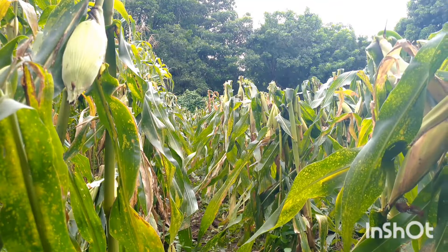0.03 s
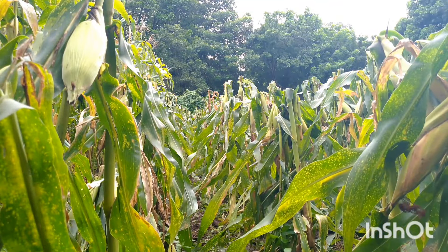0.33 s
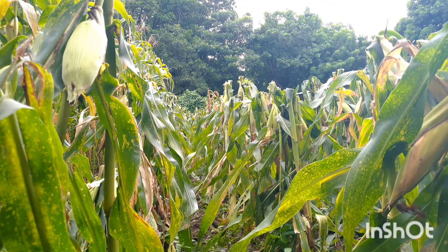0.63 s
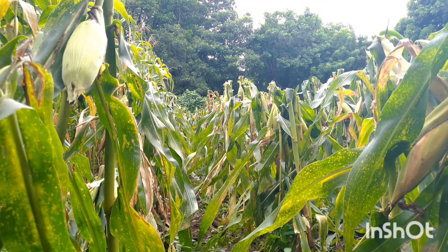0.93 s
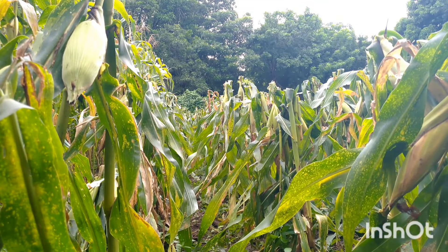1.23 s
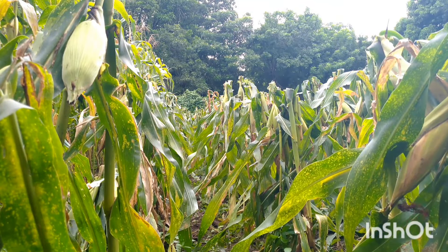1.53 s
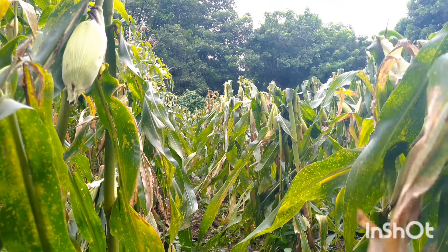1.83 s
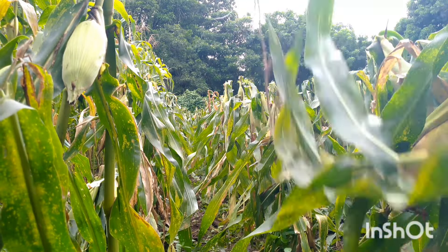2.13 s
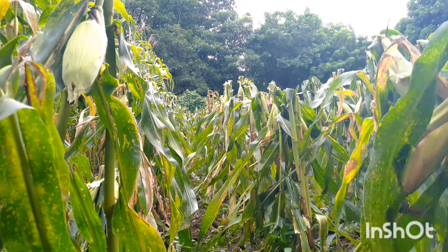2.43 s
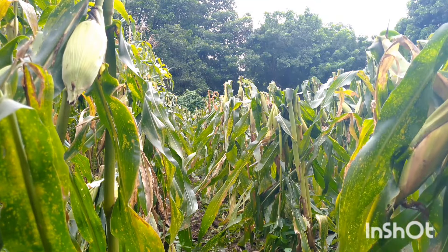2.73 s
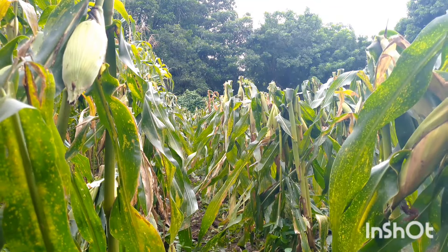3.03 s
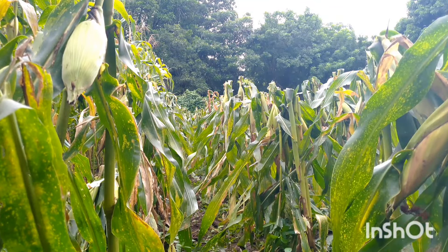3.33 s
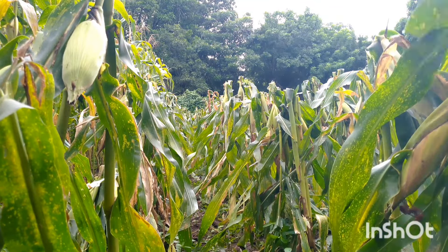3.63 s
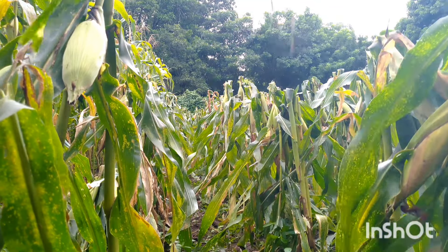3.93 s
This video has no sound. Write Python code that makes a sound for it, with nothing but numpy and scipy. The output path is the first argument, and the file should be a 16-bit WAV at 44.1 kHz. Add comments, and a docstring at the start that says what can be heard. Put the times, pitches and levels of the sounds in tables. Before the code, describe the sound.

Dry corn leaves rustle close to the microphone, softly at first, in uneven hissing strokes. Brittle ticks and light slaps start around 0.9 seconds. A leaf knocks a stalk at about 1.8 seconds, and the rustling and crackling swell until 2.8. After a brief lull near 3 seconds, the rustle returns, with a cluster of sharp snaps from 3.6 to 3.9. Faint outdoor air and a low hum lie far behind.

```python
"""In a corn field, dry leaves are pushed about close to the microphone.
Blades slide over each other in uneven strokes, and stick-slip friction excites hiss, rasp and flutter.
Ribs fracture with bright ticks, creases give way, leaves slap the stalks and one stalk rings briefly.
The surrounding plants scatter the ticks and crinkles; outdoor air and a faint low hum lie far behind."""
import sys
import numpy as np
from scipy import signal
from scipy.fft import rfft, irfft
from scipy.io import wavfile
from scipy.ndimage import uniform_filter1d

SR = 44100
rng = np.random.default_rng(int(sys.argv[2]) if len(sys.argv) > 2 else 0)


def waveform_to_disk(signal):
    """Save audio, clipped to [-1, 1], as 16-bit WAV at the path in sys.argv[1]."""
    frames = np.transpose(np.atleast_2d(signal))
    scaled = np.clip(frames, -1, 1) * 32767
    samples = np.round(scaled).astype(np.int16)
    wavfile.write(sys.argv[1], SR, samples)


N = 176400

# Continuous rustle beneath the strokes: (time [s], hiss level [dB])
STIR_LEVELS = [(0, -45.5), (.08, -44), (.28, -43.5), (.59, -39.5), (.625, -44.5), (.69, -41), (.84, -43),
               (1.06, -39), (1.115, -43), (1.3, -37), (1.7, -39.5), (1.9, -37.5), (2.25, -52), (2.5, -37.5),
               (2.82, -40), (2.9, -43), (3.02, -48.5), (3.11, -46), (3.3, -40.5), (3.66, -43.5), (4.0, -67)]
# One leaf sliding over another:
# (start [s], rise [s], hold [s], release [s], hiss [dB], rasp [dB], flutter [dB])
SLIDING_STROKES = [ (0.094, 0.029, 0.065, 0.11, -35.5, -44, -48.5),
                   (0.272, 0.12, 0.1, 0.036, -40, -47.5, -51),
                   (0.864, 0.014, 0.018, 0.023, -35, -41, -47.5),
                   (1.202, 0.005, 0.0075, 0.16, -32, -42.5, -47),
                   (1.4, 0.063, 0.027, 0.094, -35.5, -45, -50.5),
                   (1.514, 0.053, 0.038, 0.091, -31, -48, -53),
                   (1.729, 0.045, 0.0097, 0.045, -29.5, -41, -44),
                   (1.929, 0.017, 0.012, 0.03, -32, -37.5, -65),
                   (1.984, 0.028, 0.11, 0.068, -33, -44.5, -75),
                   (2.096, 0.082, 0.13, 0.035, -30, -40, -45.5),
                   (2.204, 0.094, 0.046, 0.052, -40, -37.5, -49),
                   (2.319, 0.016, 0.062, 0.12, -31.5, -40, -46.5),
                   (2.508, 0.062, 0.026, 0.13, -38, -37.5, -48.5),
                   (2.675, 0.028, 0.052, 0.044, -37, -39.5, -55),
                   (3.228, .006, 0.02, 0.13, -31, -41.5, -56),
                   (3.367, 0.027, 0.062, 0.036, -35.5, -45, -73),
                   (3.72, 0.03, 0.084, 0.066, -38, -51.5, -75), (3.839, 0.03, 0.1, .08, -31, -37, -49),
                   (3.91, 0.015, 0.049, 0.032, -27.5, -38, -41)]
# Dry ribs breaking: (time [s], level [dB], tick frequency [Hz], blade jolt re tick [dB])
RIB_SNAPS = [ (0.8906, -19.5, 8000, -11), (1.0749, -16, 8950, -11), (1.0922, -10.5, 9650, -39),
             (1.182, -17, 8500, -23), (1.4371, -27, 7000, 11), (1.794, -11, 9300, -30),
             (1.9774, -10, 8500, -35), (2.0778, -8, 8600, -41), (2.0896, -8.5, 10400, -10.5),
             (2.1076, -11.5, 6800, -26), (2.118, -11.5, 7900, -18), (2.6978, -12.5, 8440, -10),
             (2.7375, -13, 9500, -29), (3.368, -10, 10100, -44), (3.407, -18, 9000, -10),
             (3.6047, -17, 8100, -33), (3.6113, -8, 7640, -20.5), (3.6780, -5.5, 7900, -22),
             (3.694, -10, 7900, -28), (3.725, -16, 7550, -34), (3.7596, -16.5, 7040, -34),
             (3.7688, -17, 8400, -33), (3.8093, -12, 9700, -21), (3.8116, -12, 8600, -32),
             (3.8255, -12, 9200, -28), (3.9094, -10.5, 9300, -35)]
# A leaf buckling or slapping a stalk:
# (time [s], level [dB], centre frequency [Hz], width [octaves], decay time [s])
LEAF_SLAPS = [ (0.154, -37.5, 480, 1.7, 0.012), (0.891, -31, 3250, 0.39, 0.0043),
              (1.068, -34, 2090, 0.18, 0.0085), (1.074, -27.5, 10000, 1.3, 0.008),
              (1.156, -28, 3500, 2.1, 0.011), (1.183, -24.5, 6500, 1.8, 0.0059),
              (1.263, -30, 980, 0.58, 0.0047), (1.314, -31.5, 2600, 1.2, 0.0029),
              (1.469, -37, 750, 1.4, 0.0093), (1.5108, -25, 3430, 0.44, 0.0035),
              (1.7331, -21.5, 1040, 1.8, 0.0068), (1.743, -20, 3870, .3, 0.0017),
              (1.766, -27.5, 700, 1.7, 0.0048), (1.774, -27, 1410, 0.67, 0.005),
              (2.089, -45, 150, 2, 0.0069), (2.106, -26, 2690, 0.48, 0.012),
              (2.181, -18.5, 9000, 1.3, 0.006), (2.222, -27, 5500, 1.6, 0.016),
              (2.288, -25.5, 4000, 2.4, 0.0069), (2.341, -26, 1900, 0.93, 0.0072),
              (2.592, -39, 1740, 0.082, 0.033), (2.981, -34.5, 1780, 1.35, 0.0061),
              (3.492, -29.5, 380, 2.2, 0.012), (3.493, -28, 1300, 0.84, 0.0062),
              (3.493, -26.5, 7700, 0.63, 0.028), (3.625, -36, 1830, 0.87, 0.0032),
              (3.677, -28.5, 650, 1.86, 0.0023), (3.693, -28, 3550, 1.24, 0.0079),
              (3.7863, -19, 9900, 0.48, 0.0033), (3.7875, -25, 1300, 1.9, 0.0015),
              (3.832, -34.5, 880, 1.5, 0.0039)]
# Spectra of leaf edge, blade, whole leaf and outdoor air: (frequency [Hz], relative density [dB])
HISS_SPECTRUM = [(1500, -53.5), (3500, -12.5), (5000, -11), (7000, -6), (9000, -3), (10500, 0),
                 (11200, -4.5), (12000, -11.5), (14000, -8.5), (15500, -10.5)]
RASP_SPECTRUM = [(400, -21), (900, -8), (1500, -1.5), (2100, 0.5), (2800, 3.5), (4000, -1.5), (6000, -2),
                 (12000, -16)]
FLUTTER_SPECTRUM = [(30, -35), (100, 3), (200, 7), (450, 7.5), (800, 8), (1300, 6.5), (2500, 6),
                    (8000, -50)]
AIR_SPECTRUM = [(20, -18), (50, 5.5), (100, -14.5), (200, -9), (500, 0), (1500, -7.5), (5000, -36),
                (15000, -17)]
# Lower tone of the distant hum: (time [s], frequency [Hz], level [dB])
HUM_TRACK = [(0, 103, -61), (.55, 99, -66), (.9, 97, -60), (1.2, 99, -69.5), (1.55, 95, -62),
             (2.3, 100, -78), (2.8, 101, -67.5), (3.25, 106, -57), (3.6, 102, -75)]


def leaf_friction(strength, fizz_hz=11200, fizz_ref_db=-16):
    """Stick-slip friction excites the leaf edge (hiss), the blade (rasp) and the limp leaf (flutter)."""
    hiss, rasp, flutter = strength * amp(wander(rate_hz=57))
    edge = colour(slips(per_s=25000, spread_db=2.5, cap=11), HISS_SPECTRUM)
    fizz = signal.sosfiltfilt(signal.butter(6, fizz_hz, "high", fs=SR, output="sos"), edge)
    edge += fizz * ((hiss / amp(fizz_ref_db)) ** 0.059 - 1)  # faster rubbing is brighter
    hiss *= edge * amp(0.79 * wander(rate_hz=34))
    blade = colour(slips(per_s=4500, spread_db=1, cap=4.6), RASP_SPECTRUM)
    rasp *= blade * amp(wander(rate_hz=150))
    leaf = colour(slips(per_s=2700, spread_db=2, cap=4.7), FLUTTER_SPECTRUM)
    flutter *= leaf * amp(1.75 * wander(rate_hz=22))
    return drifting_colour(hiss + rasp + flutter, depth_db=2)


def friction_strength(stir_ref_db=-40, rasp_db=-46, flutter_db=-54.5):
    """Incoherent sources add in power: stir and strokes give the hiss, rasp and flutter amplitudes."""
    t = np.arange(N) / SR
    stir_db = np.interp(t, *np.transpose(STIR_LEVELS))
    swell_db = stir_db - stir_ref_db
    power = amp([stir_db, rasp_db + swell_db, flutter_db + swell_db]) ** 2
    for start, rise, hold, release, *levels_db in SLIDING_STROKES:
        speed = np.interp(t, start + np.cumsum([0, rise, hold, release]), [0, 1, 1, 0])
        power += (amp(levels_db)[:, None] * speed) ** 2
    return np.sqrt(power)


def slips(per_s, spread_db, cap):
    """A Poisson process of tiny slips, a few larger than the rest; sizes span cap times spread_db."""
    size = amp(spread_db * np.minimum(rng.exponential(1, N), cap))
    return unit(size * rng.choice([-1, 1], N) * (rng.random(N) < per_s / SR))


def drifting_colour(x, depth_db, size=512):
    """Brief, narrow patches of random spectral gain make the rustle's colour flicker."""
    spectrogram = signal.stft(x, nperseg=size)[2]
    patches = uniform_filter1d(rng.standard_normal(spectrogram.shape), size=6, axis=0)
    patches = unit(uniform_filter1d(patches, size=3, axis=1))
    return signal.istft(spectrogram * amp(depth_db * patches), nperseg=size)[1][:N]


def rib_snap(level_db, hz, jolt_db):
    """Brittle fracture of a rib radiates a bright tick and a duller jolt of its blade."""
    tick = ping(hz, rise_s=0.00009)
    jolt = amp(jolt_db) * ping(hz=2600, rise_s=0.00007)
    return amp(level_db) * signal.sosfilt(signal.butter(2, 12700, fs=SR, output="sos"), tick + jolt)


def leaf_slap(level_db, hz, octaves, decay_s, rise_s=0.0004, size=8192):
    """Buckling or impact drives one heavily damped resonance with a burst of crackly noise."""
    t, f = np.arange(size) / SR, np.fft.rfftfreq(size, 1 / SR)
    band = np.exp(-0.5 * (np.log2((f + 1) / hz) / octaves) ** 2)
    crackle = rng.standard_normal(size) * np.exp(0.26 * rng.standard_normal(size))
    envelope = np.minimum(t / rise_s, 1) * np.exp(-t / decay_s)
    crumple = irfft(rfft(crackle) * band) * envelope
    return amp(level_db) * crumple * np.linalg.norm(envelope) / np.linalg.norm(crumple)


def stalk_knock(level_db=-25.5, hz=275, sag_s=0.059, decay_s=0.0052, size=4096):
    """Damped free vibration of a stalk struck by a leaf: a hollow note whose pitch sags as it dies."""
    t = np.arange(size) / SR
    cycles = np.cumsum(hz * np.exp(-t / sag_s)) / SR
    return amp(level_db) * np.sin(2 * np.pi * cycles) * np.exp(-t / decay_s)


def crinkles(hiss_strength, level_db=-52, per_s=170, pitches=24, rise_cycles=0.47):
    """Small creases buckle at random, each ringing at its own pitch, more loudly in the strokes."""
    out = np.zeros(N)
    for hz in np.geomspace(1400, 10500, pitches):
        clicks = slips(per_s / pitches, spread_db=3, cap=1.5)
        ring = unit(scattering(ping(hz, rise_cycles / hz)))
        out += signal.oaconvolve(clicks, ring)[:N]
    return amp(level_db) * unit(out * hiss_strength ** 0.68)


def ping(hz, rise_s, size=256):
    """A damped oscillation of a few cycles, whose envelope peaks at 1 after rise_s."""
    t = np.arange(size) / SR
    return t / rise_s * np.exp(1 - t / rise_s) * np.sin(2 * np.pi * hz * t)


def scattering(x, near_s=0.0057, near_db=-8.5, far_s=0.032, far_db=-18, size=4096):
    """Diffuse scattering: nearby leaves return a short spray of echoes, the field a weaker, longer one."""
    t = np.arange(size) / SR
    near, far = rng.standard_normal((2, size)) * np.exp(-t / np.array([[near_s], [far_s]]))
    tail = amp(near_db) * near / np.linalg.norm(near) + amp(far_db) * far / np.linalg.norm(far)
    direct = t == 0
    return signal.oaconvolve(x, direct + tail)


def air_and_hum(air_db=-60, upper_ratio=1.45, upper_db=-69):
    """Ambient noise: broadband outdoor air and two distant tones, modulated in pitch and level."""
    times, hz, db = np.transpose(HUM_TRACK)
    t = np.arange(N) / SR
    pitch = np.interp(t, times, hz)
    out = amp(air_db) * colour(rng.standard_normal(N), AIR_SPECTRUM)
    for ratio, level_db in ((1, np.interp(t, times, db)), (upper_ratio, upper_db)):
        cycles = np.cumsum(ratio * pitch * (1 + 0.0763 * wander(rate_hz=21.8))) / SR
        tone = np.sin(2 * np.pi * cycles) * amp(1.5 * wander(rate_hz=11))
        out += amp(level_db) * unit(tone)
    return out


def colour(x, spectrum, size=4096):
    """Minimum-phase filtering imposes a spectrum causally; the output has rms 1."""
    f, db = np.transpose(spectrum)
    hz = abs(np.fft.fftfreq(size, 1 / SR))
    log_gain = np.log(amp(np.interp(np.log(hz + 1), np.log(f), db)))
    response = np.exp(np.conj(signal.hilbert(log_gain)))
    ring = np.fft.ifft(response).real[:size // 2]
    return unit(signal.oaconvolve(x, ring)[:N])


def wander(rate_hz):
    """Low-pass filtered noise gives a random fluctuation of rms 1."""
    hz = np.fft.rfftfreq(N, 1 / SR)
    return unit(irfft(rfft(rng.standard_normal(N)) / (1 + (hz / rate_hz) ** 2), N))


def amp(db):
    """Amplitude ratio for a level in decibels."""
    return 10 ** (np.asarray(db) / 20)


def unit(x):
    """Normalisation to rms 1."""
    return x / np.sqrt(np.mean(x ** 2) + 1e-20)


def add(mix, start_s, sound):
    """Superposition of a delayed sound on the mix."""
    part = mix[max(round(start_s * SR), 0):][:len(sound)]
    part += sound[:len(part)]


def scene():
    """Linear superposition of friction, crinkles, snaps, slaps and a knock over the background."""
    strength = friction_strength()
    out = leaf_friction(strength) + crinkles(strength[0]) + air_and_hum()
    for start_s, *snap in RIB_SNAPS:
        add(out, start_s, scattering(rib_snap(*snap)))
    for start_s, *slap in LEAF_SLAPS:
        add(out, start_s, leaf_slap(*slap))
    add(out, start_s=1.7775, sound=stalk_knock())
    return out[None]


def record(dry, low_hz=32, high_hz=15600):
    """Band limiting: the microphone sheds the deepest bass, and a steep low-pass the highest treble."""
    thin = signal.sosfilt(signal.butter(2, low_hz, "high", fs=SR, output="sos"), dry)
    low_pass = signal.firwin(511, high_hz, window=("kaiser", 9), fs=SR)
    return signal.oaconvolve(thin, low_pass[None], "same")


dry = scene()
out = record(dry)
waveform_to_disk(out)
```